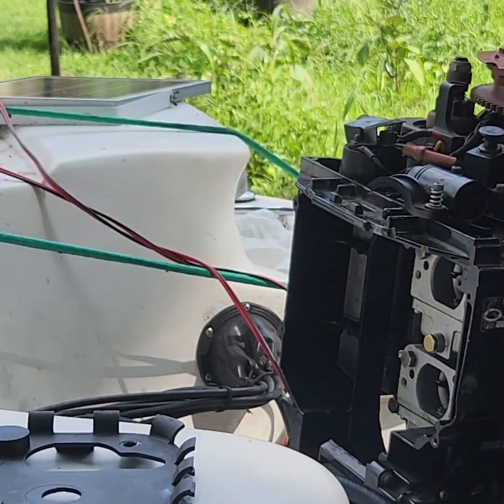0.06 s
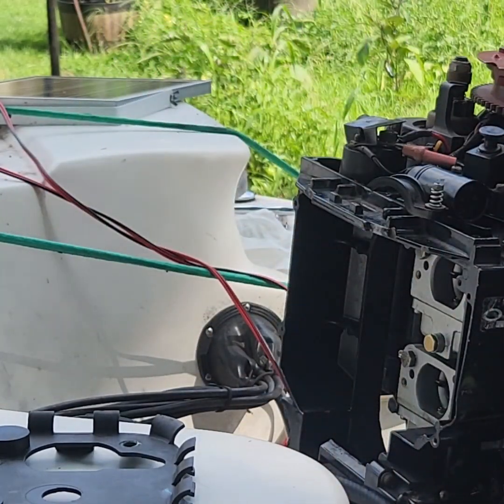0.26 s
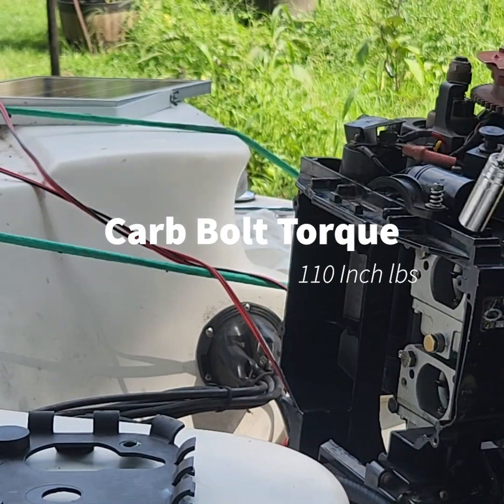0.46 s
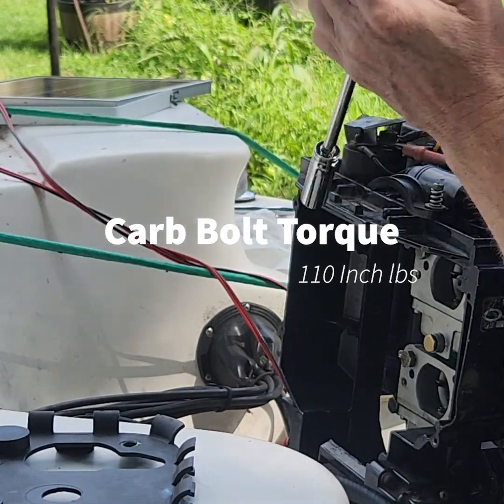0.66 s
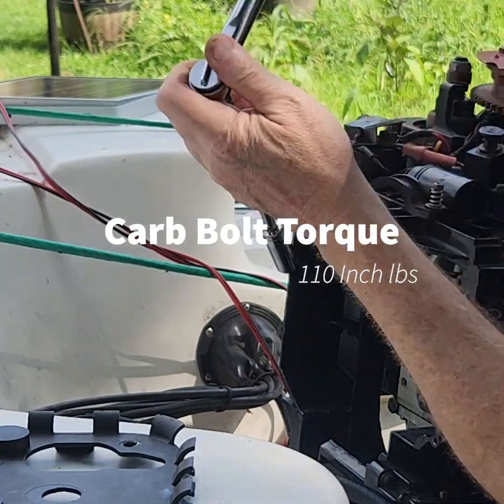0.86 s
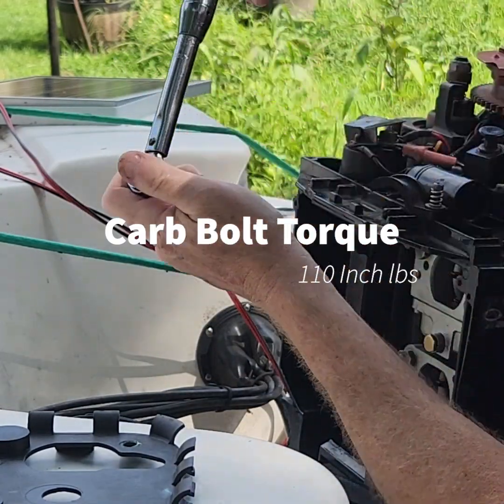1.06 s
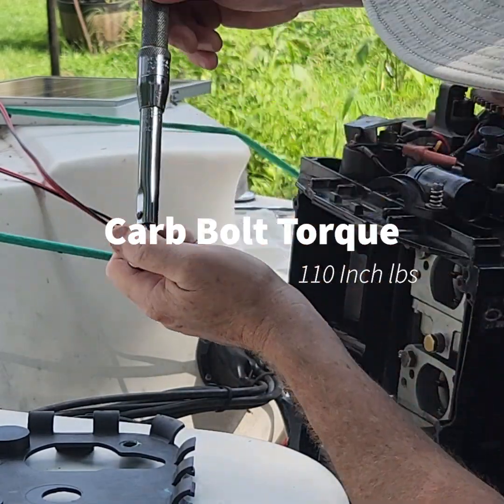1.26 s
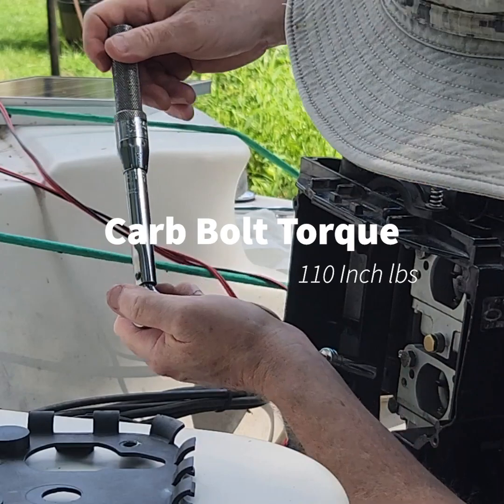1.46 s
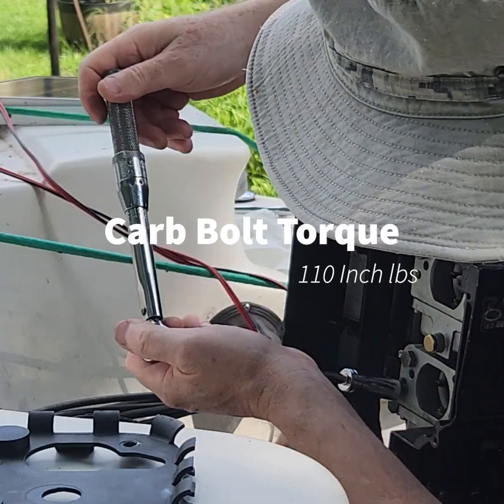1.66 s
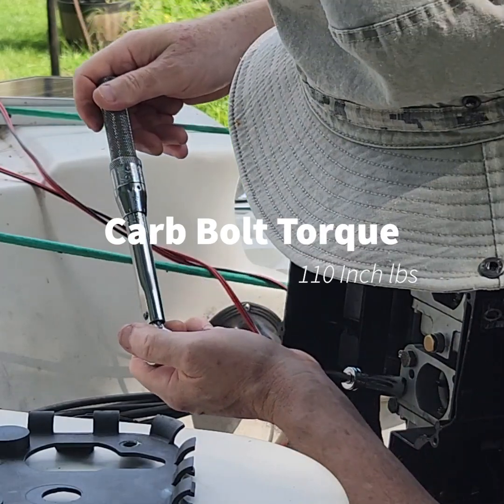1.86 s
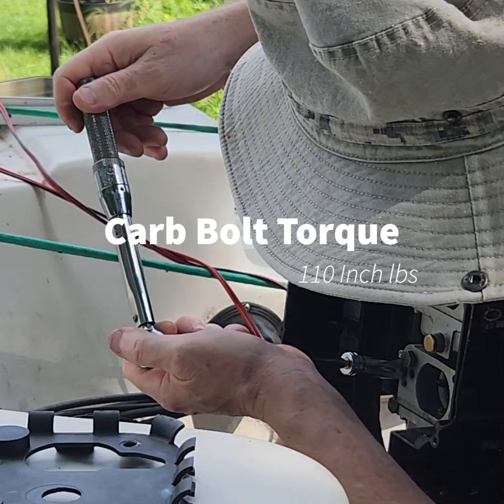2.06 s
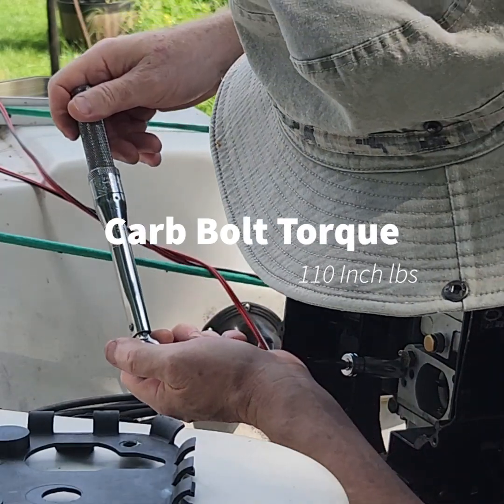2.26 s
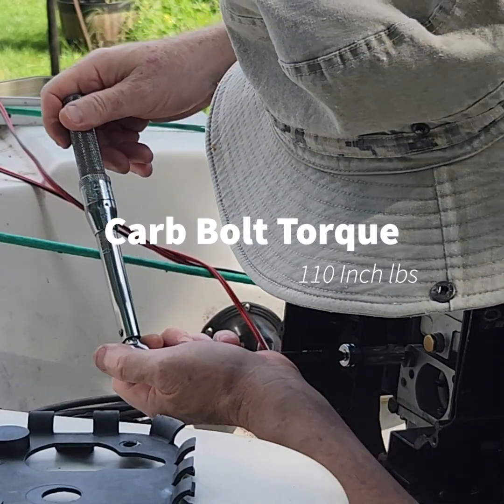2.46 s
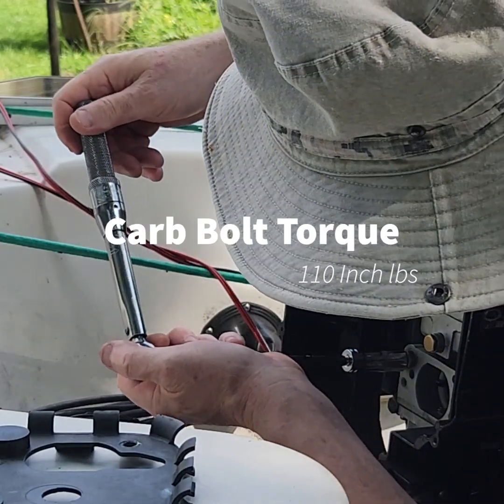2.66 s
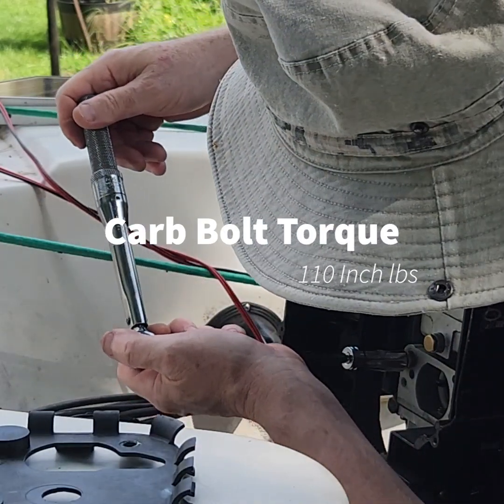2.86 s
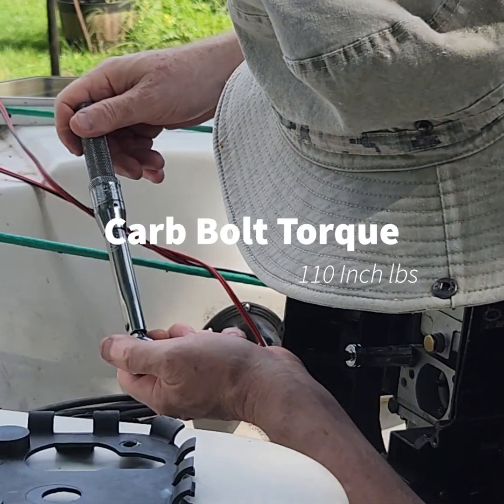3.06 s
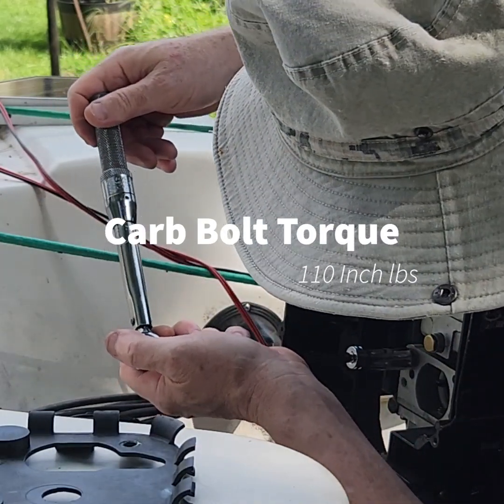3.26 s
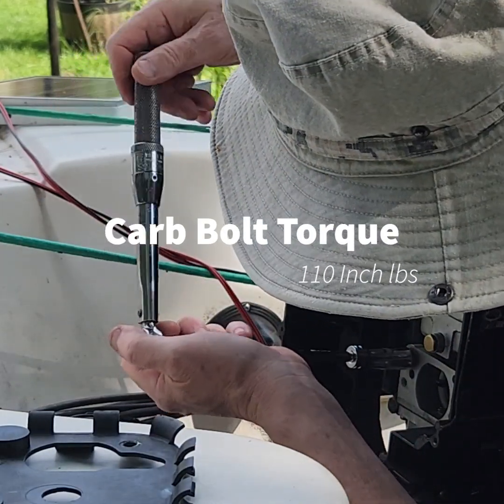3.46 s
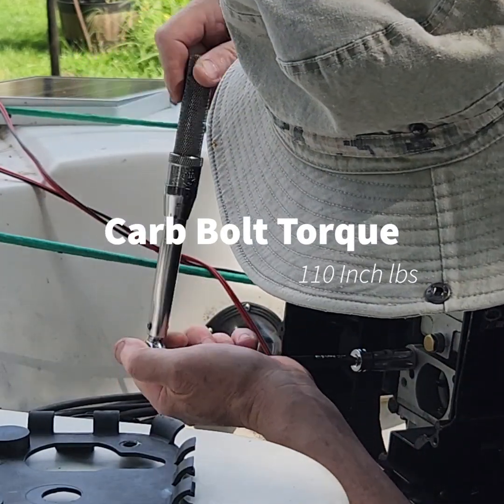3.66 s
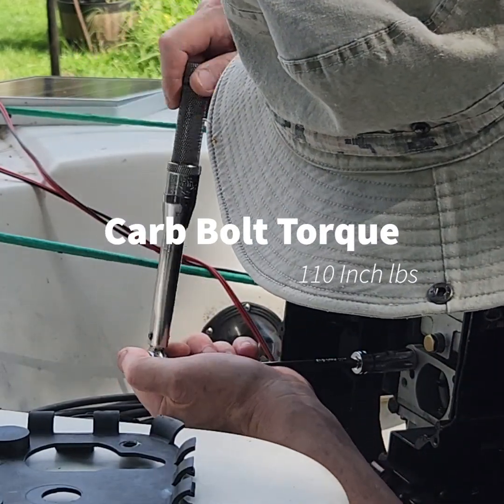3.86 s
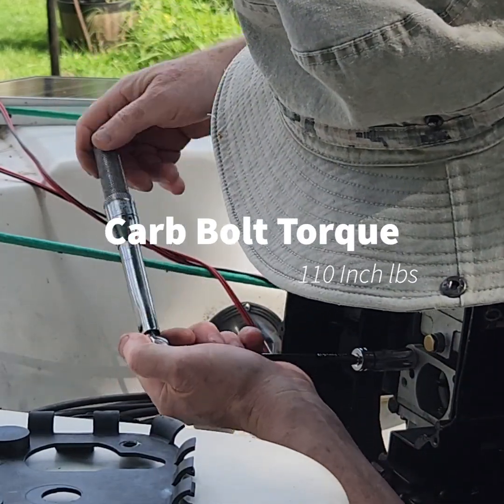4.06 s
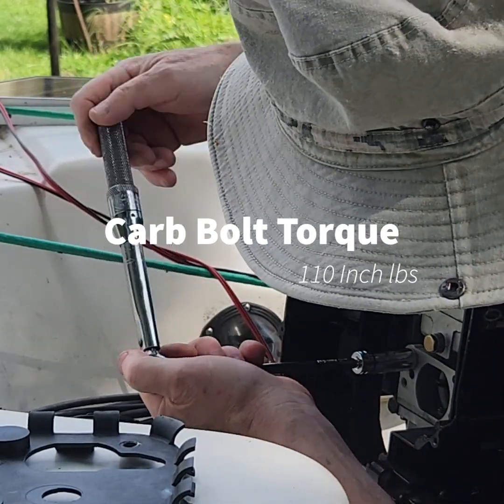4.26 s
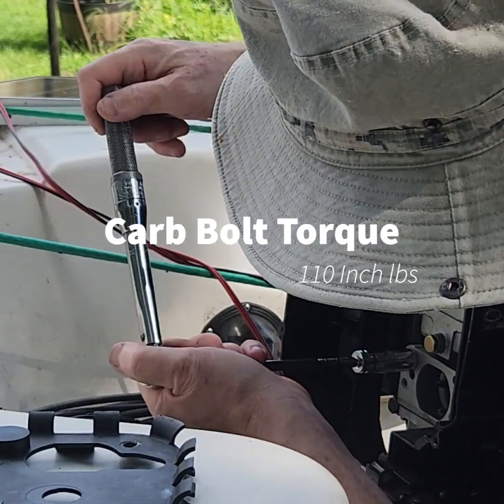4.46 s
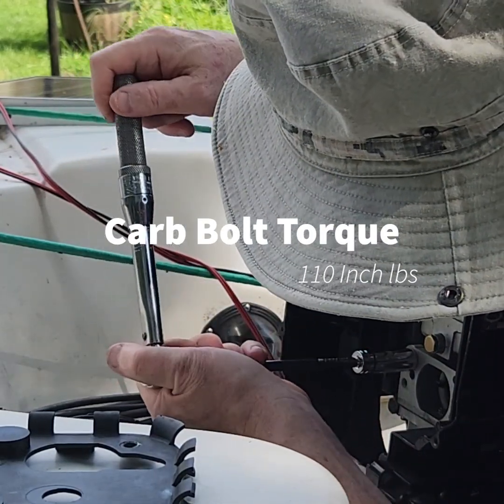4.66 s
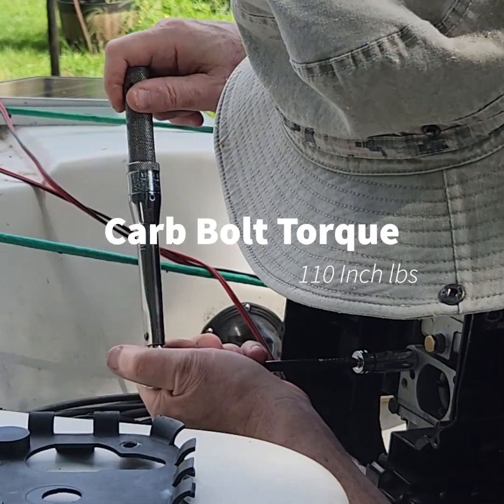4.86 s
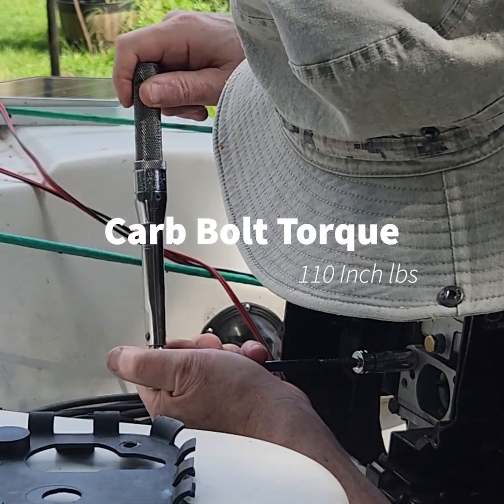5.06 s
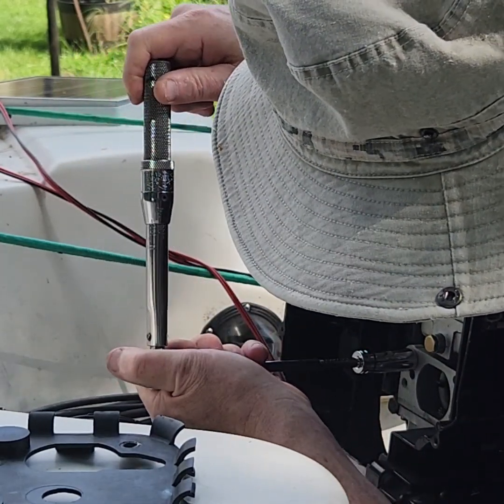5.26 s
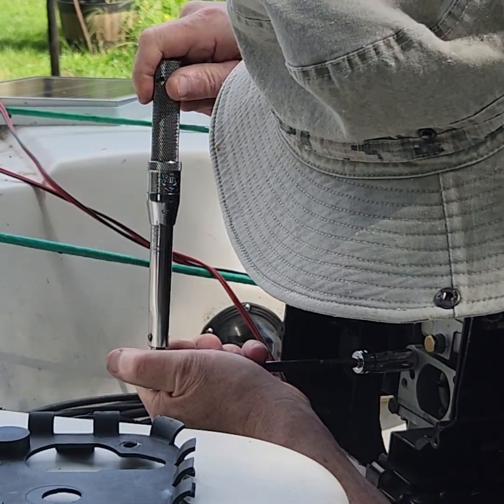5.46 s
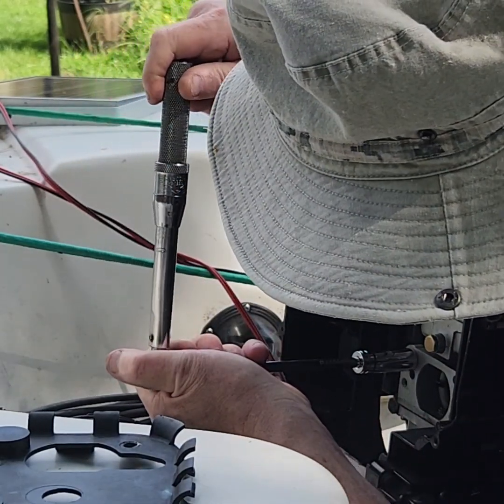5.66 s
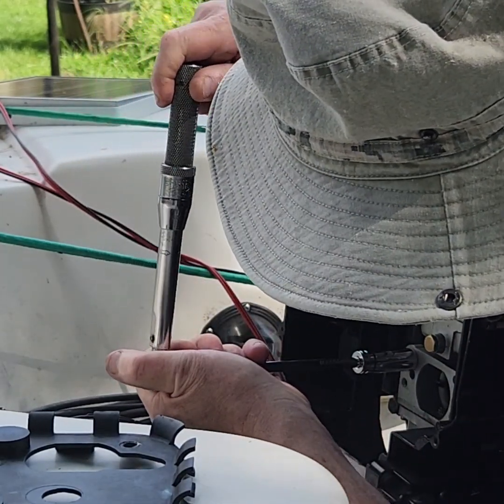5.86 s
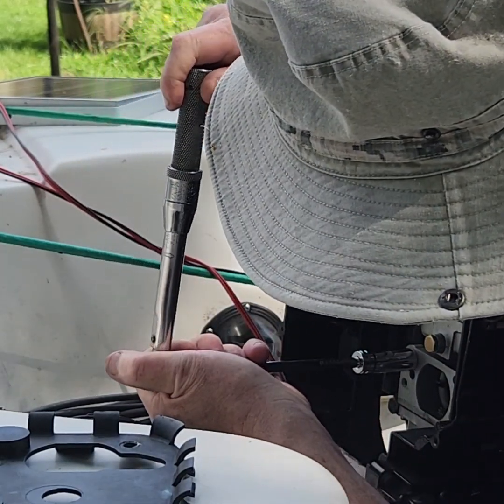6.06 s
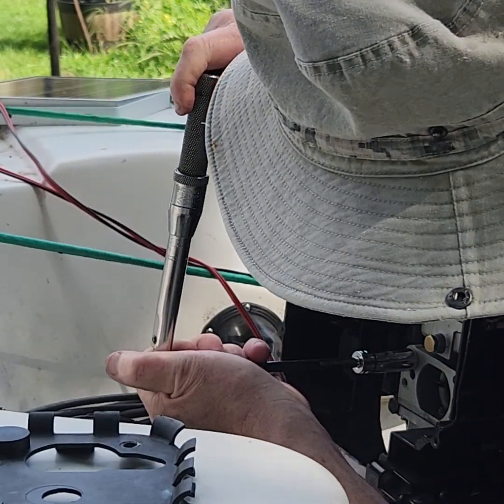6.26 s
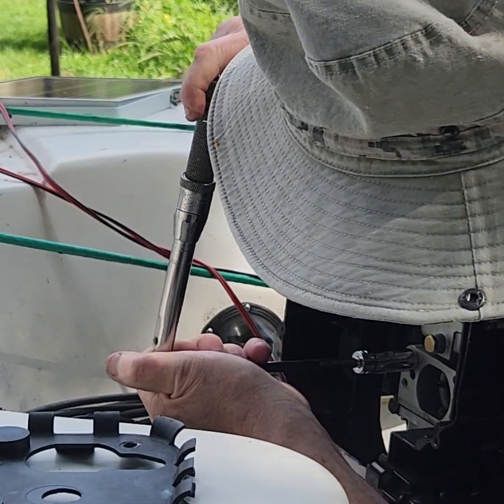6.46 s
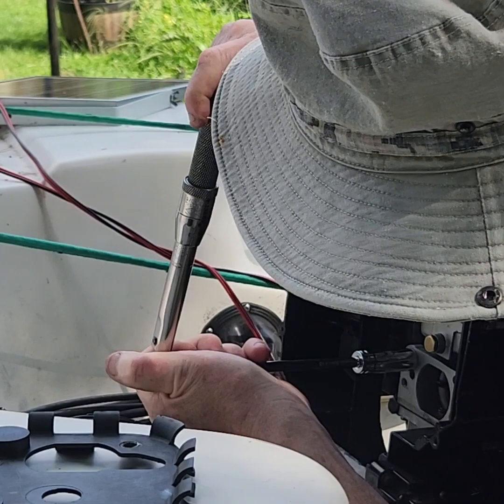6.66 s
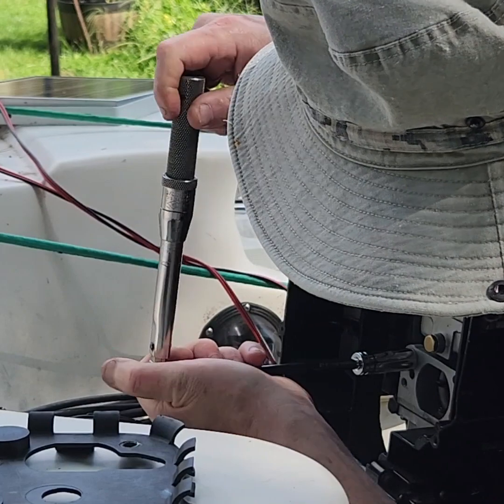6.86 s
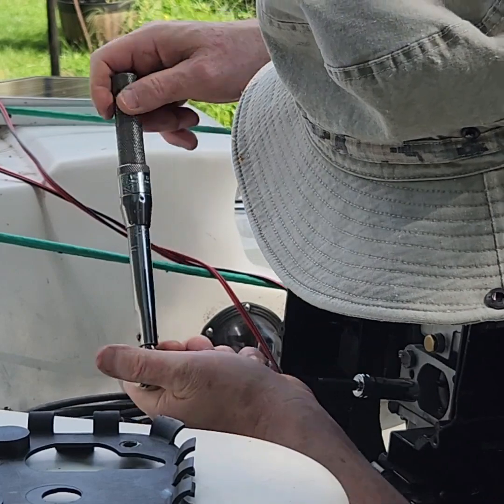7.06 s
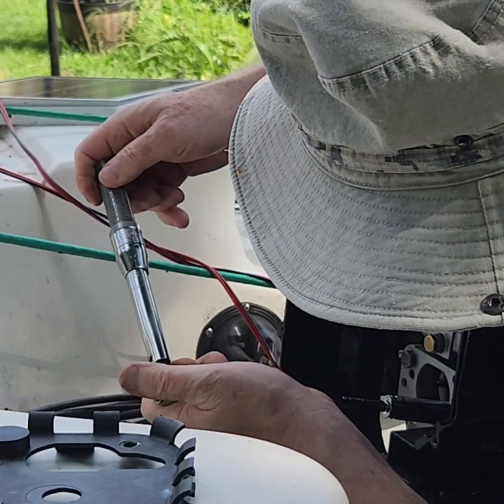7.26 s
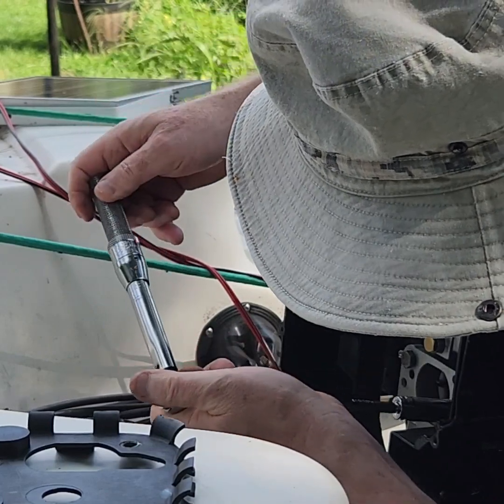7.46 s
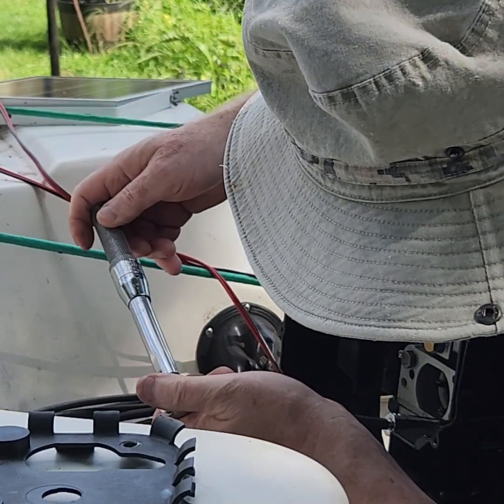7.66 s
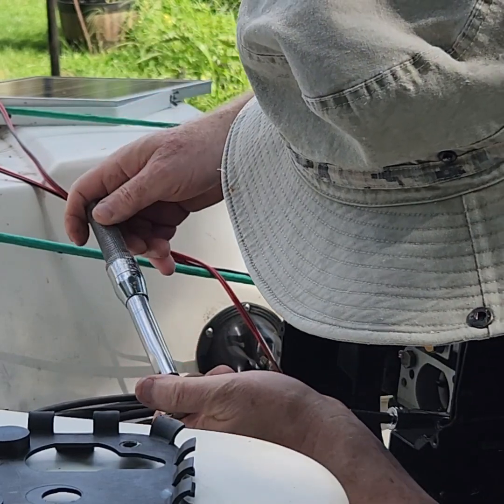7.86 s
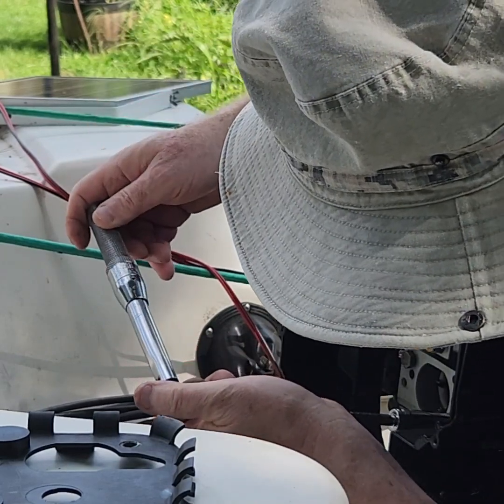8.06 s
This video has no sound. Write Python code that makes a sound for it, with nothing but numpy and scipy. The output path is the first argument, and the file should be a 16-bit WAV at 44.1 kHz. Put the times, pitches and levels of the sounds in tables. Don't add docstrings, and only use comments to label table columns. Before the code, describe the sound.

Outdoors, close to the work, a shrill steady insect hiss sits over faint low traffic and rustling leaves. Small steel knocks come irregularly as a socket is fitted, then a firm metallic clack, a quick run of thin ratchet ticks, and a long pause. Late on, a very loud, dry wrench crack and a slightly softer reset snap follow, then a few loose clinks. Faint birds call far away.

```python
import sys
import numpy as np
from scipy import signal
from scipy.fft import rfft, irfft, next_fast_len
from scipy.io import wavfile
from scipy.ndimage import uniform_filter1d

SR = 44100
rng = np.random.default_rng(int(sys.argv[2]) if len(sys.argv) > 2 else 0)


def volts(x):
    e = np.asarray(x, float) / 20
    return 10 ** e


def wav_out(sig):
    wavfile.write(sys.argv[1], SR, np.round(np.clip(np.atleast_2d(sig).T, -1, 1) * 32767).astype(np.int16))


N = 358091


def unit(x):
    return x / np.sqrt(np.mean(x ** 2))


def ears_db(left_minus_right_db):
    return np.array([[left_minus_right_db], [-left_minus_right_db]]) / 2


def add(out, sound, s):
    i = int(s * SR)
    out[:, i:i + sound.shape[1]] += sound[:, :N - i]


def shaped(x, gain):
    size = next_fast_len(N)
    hz = np.arange(size // 2 + 1) * SR / size + 1
    return irfft(rfft(x, size) * gain(hz), size)[..., :N]


def walk(rate_hz):
    k = int(SR / rate_hz)
    held = np.repeat(rng.standard_normal(N // k + 1), k)
    return 0.83 * uniform_filter1d(uniform_filter1d(held, k), k)[:N]


HULL_DB, HULL_T60_S = -31.5, 0.17
CRACK_DB, SOFT_CRACK_DB = -5, -20
EAR_TURN_RAD = 0.76


def strike(modes, peak_db, chatter_s, chatter_db, pan_db, spread=1.0, hull_db=HULL_DB, crack_db=CRACK_DB):
    hz, db, t60_s = np.transpose(modes)
    t = np.arange(SR // 6) / SR
    both, apart = rng.standard_normal((2, len(hz)))
    ear_turn = EAR_TURN_RAD * np.sign(apart) * np.minimum(hz / 900, 1) * np.array([[-1], [1]])
    weight = volts(db) * np.exp(1j * spread * (both + ear_turn))
    ring = (weight @ np.exp(np.outer(2j * np.pi * hz - np.log(1000) / t60_s, t))).imag
    ring = ring * np.minimum(t / 0.00039, 1)
    damped = (weight @ np.exp(np.outer(2j * np.pi * hz - hz / 8.0 - 500, t[:512]))).imag
    noise = rng.standard_normal((3, len(t)))
    chatter = volts(chatter_db) * (noise[0] + 0.27 * noise[1:]) * np.exp(-t / chatter_s)
    diffuse = uniform_filter1d(noise[1:, ::-1], size=2, axis=1)
    echo = volts(hull_db) * diffuse * np.exp(-np.log(1000) * t / HULL_T60_S)
    sound = ring + signal.fftconvolve(damped, chatter + echo, axes=1)[:, :len(t)]
    sound[:, :damped.shape[1]] += volts(crack_db) * np.diff(damped, prepend=0)
    return sound / np.abs(sound).max(axis=1, keepdims=True) * volts(peak_db + ears_db(pan_db))


# t/s, peak level/dB, chatter decay/s, chatter level/dB, left minus right/dB
SNAPS = [
    (3.6105, -13, 0.0083, -25, 0.5),
    (6.5295, -2.5, 0.0012, -10.5, 2),
    (6.7711, -9, 0.0037, -14.5, 3.3),
]
# f/Hz, level/dB, t60/s
SEAT_MODES = [(600, -37, .04), (930, -35, .04), (1220, -5.5, 0.04), (1555, 2.5, 0.021), (2060, -9, 0.05),
              (2350, 3.5, 0.022), (2886, 5, 0.04), (3230, 3.5, 0.017), (3850, -10, .04), (4500, 3, 0.013),
              (5630, -3, 0.01), (6950, 0, 0.013), (8000, -3, 0.014), (8740, -8, .012), (10500, -7, .012),
              (11760, -7, .02), (13050, -9, 0.02), (14500, -1.5, .012), (15100, -13, .01)]
# f/Hz, level/dB, t60/s
BREAK_MODES = [(97, -19, 0.25), (564, -21, 0.12), (985, -12, 0.048), (1516, -7, 0.041), (2140, -35, 0.017),
               (2660, -9.5, 0.013), (2770, -16, 0.094), (3180, 1, 0.018), (3420, -27, 0.045),
               (4400, -13, 0.025), (4740, -7.5, .015), (5370, -3.5, 0.02), (6530, -12, 0.017),
               (7800, -16, 0.016), (7350, 2, 0.032), (7860, 6, 0.022), (9290, 2.5, 0.012),
               (10600, -8, 0.0092), (12250, -6, 0.013), (11600, -5, 0.012), (13640, -13, .01),
               (14900, -7, 0.011)]
# f/Hz, level/dB, t60/s
RESET_MODES = [(366, -27, 0.22), (754, -21, 0.082), (905, -4, 0.065), (1463, -3, 0.071), (1950, -10, 0.055),
               (2520, -8, .015), (2740, -19, 0.098), (3040, 1, 0.019), (3800, -2.5, 0.02),
               (4500, -3, 0.023), (5140, -17, 0.017), (5430, 4.5, 0.019), (6300, -10, .02),
               (7150, -22, .018), (7400, 9, 0.013), (8000, -23, .015), (9000, -29, .012),
               (10600, -25, .012), (11700, -11, 0.015), (12570, -4, .014), (13900, -20.5, .012),
               (15800, -18, 0.0085)]


def snaps():
    out = np.zeros((2, N))
    for (s, *blow), modes in zip(SNAPS, (SEAT_MODES, BREAK_MODES, RESET_MODES)):
        add(out, strike(modes, *blow), s)
    return out


# t/s, peak level/dB, level under 6 kHz/dB, bounce delay/s, bounce level/dB
TICKS = [
    (3.921, -31, -12, .0078, -5),
    (3.9541, -29, -12, 0.0041, -4),
    (3.9843, -25.5, -20, .0064, -6.5),
    (4.019, -31.5, -2, .0059, -8.5),
    (4.0716, -33, -4, .0113, -10),
]
# f/Hz, level/dB, t60/s
PAWL = [(2980, -15, 0.016), (3500, 7.5, 0.0081), (4670, 1, 0.0083), (5360, 3, 0.014), (6530, 5.5, 0.0045),
        (7740, 13, 0.0061), (8580, 1, 0.019), (9800, -16, 0.0036), (11000, 1, 0.0079), (12000, 3, 0.0096),
        (12500, -3, 0.0056), (13600, 7, .007), (15000, -3, .007), (15000, -11, 0.0073)]
BOUNCE_LOW_DB, PAWL_HULL_DB = 1.5, -37


def ratchet():
    out, pawl = np.zeros((2, N)), np.array(PAWL)
    low = np.outer(pawl[:, 0] < 6000, [0, 1, 0])
    for s, db, low_db, after_s, bounce_db in TICKS:
        drop = strike(pawl + low * low_db, db + 6.0, 0.0014, -17, 1.7, hull_db=PAWL_HULL_DB)
        add(out, drop, s)
        bounce = strike(pawl + low * BOUNCE_LOW_DB, db + 6.5 + bounce_db, 0.00076, -17.5, 2.8,
                        hull_db=PAWL_HULL_DB)
        add(out, bounce, s + after_s)
    return out


# t/s, peak level/dB, loose-fit f/Hz, loose fit over shaft/dB, hardness/dB
KNOCKS = [(0.3494, -50.5, 1410, -3, -4), (1.7075, -30.5, 1406, 3, -14.5), (2.0713, -34, 1135, 6.5, 2),
          (2.1035, -39.5, 1365, 30, -7), (2.513, -30.5, 1383, -3.5, -1), (2.9797, -32.5, 1450, -13, -14),
          (3.057, -38.5, 1060, -11, -17), (3.0808, -29.5, 1133, 10, 1), (3.5950, -42, 1460, 11, 1),
          (3.604, -33, 1253, 8, -2), (4.388, -49, 1500, -14, -33), (6.5245, -36, 1400, -15, 13),
          (6.766, -36, 1400, 2, 2), (6.958, -46.5, 1330, 8, 5), (7.3327, -50, 1390, -1, -9),
          (7.4008, -28.5, 1600, -2, -1.5), (7.505, -40, 1160, 3, -16), (7.5216, -32, 1490, -2.5, -3),
          (7.5495, -40.5, 1040, 12, -3), (7.6934, -54, 1420, 10, -7), (7.8226, -38, 1160, 9, -28)]
KNOCK_BANDS_HZ = [1800, 3300, 6000]
# f/Hz, level/dB, t60/s
STEEL = [(1330, 5.5, 0.056), (840, -23, 0.036), (1190, -20, 0.04), (1573, 4.5, 0.02), (2063, -5.5, 0.11),
         (2270, 10, 0.0087), (2544, 5, 0.03), (2750, -8.5, 0.14), (2960, 4, 0.037), (3530, 9, 0.023),
         (3594, 2, 0.049), (4010, -1, 0.05), (4290, -7, 0.022), (4600, -15, .015), (5580, -2.5, 0.012),
         (6700, -8, .015), (7900, -10, 0.013), (8750, -6, 0.011), (10930, -18, 0.0092), (11950, 8.5, 0.022),
         (13100, -16, .012), (14500, 1.5, .012)]
SHRILL_DB, SHRILL_SHARE = -22, 0.26


def knocks():
    out, steel = np.zeros((2, N)), np.array(STEEL)
    band = np.searchsorted(KNOCK_BANDS_HZ, steel[:, 0])
    for s, db, loose_hz, loose_db, hard_db in KNOCKS:
        lift_db = np.array([loose_db, 0, hard_db, SHRILL_DB + SHRILL_SHARE * hard_db])[band]
        grip = 1 + 0.05 * rng.standard_normal(len(steel)) * (steel[:, 2] < 0.08)
        modes = steel * np.c_[grip, np.ones(len(steel)), grip]
        modes[:, 1] += lift_db
        modes[0, 0] = loose_hz
        add(out, strike(modes, db + 2.5, 0.012, -28.5, 4.1, crack_db=SOFT_CRACK_DB), s)
    return out


# t/s, peak level/dB
THUDS = [
    (.4480, -41),
    (.8300, -33.5),
    (7.403, -41.5),
    (7.529, -43.5),
]
# f/Hz, level/dB, t60/s
HULL = [(92, 2, 0.17), (181, -5.5, 0.11), (336, 2.5, 0.073), (560, -10, .04), (880, 2.5, 0.013),
        (1330, 0, 0.016), (2000, -9, 0.013), (3150, -18, .02)]


def thuds():
    out = np.zeros((2, N))
    for s, db in THUDS:
        add(out, strike(HULL, db, 0.03, -23, 2.5, spread=0.14, crack_db=SOFT_CRACK_DB), s)
    return out


# f/Hz, spread/Hz, skirt/(dB/kHz), click rate/Hz, throb/Hz, throb depth 0-1, level/dB, left minus right/dB
CHORUS = [(7562, 260, 34, 240, 66, 0, -45.5, 3.5), (6993, 290, 34, 240, 41.3, 0.02, -55.5, 7),
          (5590, 45, 30.5, 200, 30, 0.08, -78.5, 5.5), (13940, 3200, 7, 230, 51, 0.1, -85.5, 17)]
# f/Hz, stop t/s, extra level until then/dB
LOUD_START = (5520, .356, 9.1)


def insects(count=10):
    out = np.zeros((2, N))
    loud_hz, loud_stop_s, loud_lift_db = LOUD_START
    for hz, spread_hz, skirt_db, rate_hz, throb_hz, depth, db, pan_db in CHORUS:
        tempo = 1 + 0.1 * rng.standard_normal((2, count, 1))
        jitter = 1 + 0.15 * rng.standard_normal((2, count, 3000))
        at = np.cumsum(np.abs(SR / rate_hz * tempo * jitter), axis=2)
        beat = 2 * np.pi * throb_hz * at / SR + 0.2 * rng.standard_normal((2, count, 1))
        size = (1 + depth * np.sin(beat)) * rng.standard_normal(at.shape)
        clicks = np.array([np.bincount(a[a < N].astype(int), z[a < N], N) for a, z in zip(at, size)])

        def wing_gain(f):
            off_hz = np.hypot(f - hz, spread_hz) - spread_hz
            return volts(-skirt_db / 1000 * off_hz) * (f < 16000)

        wing = shaped(clicks, wing_gain)
        loud_db = loud_lift_db * (abs(hz - loud_hz) < 500) * (np.arange(N) < loud_stop_s * SR)
        swell_db = 0.5 * walk(2.03)
        out += unit(wing) * volts(db + ears_db(pan_db) + loud_db + swell_db)
    return out


TREES_DB = -25


def note(length_s, start_hz, end_hz, tones, rough):
    u = np.linspace(0, 1, int(length_s * SR))
    waver = uniform_filter1d(rng.standard_normal((2, len(u))), 150, axis=1) * 12
    glide_hz = start_hz + (end_hz - start_hz) * u ** 1.9
    phase = 2 * np.pi * np.cumsum(glide_hz * (1 + 0.049 * rough * u * waver[0])) / SR
    voice = sum(volts(db) * np.sin(k * phase + k * k) for k, db in tones)
    voice = unit(voice) * np.sin(np.pi * u ** 1.05) ** 0.58 * (1 + rough * waver[1])
    t = np.arange(SR // 8) / SR
    trees = rng.standard_normal((2, len(t))) * np.exp(-t / 0.035) * volts(TREES_DB)
    trees[:, 0] = 1
    return signal.fftconvolve(voice[None], trees, axes=1)


# t/s, length/s, start f/Hz, end f/Hz, level/dB
CAWS = [
    (5.917, .21, 276.3, 210, -57.5),
    (6.234, 0.18, 265, 222, -56.5),
]
# multiple, level/dB
CAW_TONES = [(6, -2), (7, 0), (8, -14), (9, -9), (10, -8), (11, -12), (12, -6), (13, -1), (14, -14)]
# t/s, length/s, start f/Hz, end f/Hz, level/dB
CHIRPS = [(0, 0.092, 1950, 1450, -68), (0, 0.097, 3776, 2875, -71.5), (.265, 0.047, 1914, 1920, -63.5),
          (.31, 0.034, 1498, 1530, -62), (1.11, 0.05, 2000, 1970, -61), (1.996, 0.068, 1885, 2000, -68.5),
          (2.753, 0.089, 2115, 1950, -70.5), (3.167, 0.042, 4100, 3920, -70),
          (5.849, 0.071, 2186, 2000, -71), (5.255, 0.089, 2114, 2140, -69.5),
          (5.318, 0.069, 2008, 1967, -66), (5.322, 0.078, 2773, 2850, -71.5),
          (5.579, .17, 2120, 1786, -66.5), (5.625, .13, 2765, 2910, -72), (5.70, 0.047, 3500, 3490, -71),
          (5.799, 0.052, 3690, 3840, -69), (6.137, 0.054, 2320, 2480, -68), (6.407, 0.042, 2980, 2970, -65)]


def birds():
    out = np.zeros((2, N))
    for s, length_s, start_hz, end_hz, db in CAWS:
        add(out, volts(db) * note(length_s, start_hz, end_hz, CAW_TONES, 0.37), s)
    for s, length_s, start_hz, end_hz, db in CHIRPS:
        add(out, volts(db) * note(length_s, start_hz, end_hz, [(0.98, 0)], 0.6), s)
    return out * volts(ears_db(3))


def curve(rows):
    s, db, rise, fall = np.transpose(rows)[:, :, None]
    late = np.arange(N) / SR - s
    drop_db = np.where(late < 0, -late * rise, late * fall)
    return np.maximum(db - drop_db, 0).max(axis=0)


# peak t/s, level over calm/dB, rise/(dB/s), fall/(dB/s)
LEAVES = [
    (0.0, 27, 50, 45),
    (1.16, 8.5, 8, 30),
    (3.0, 16, 15, 43),
    (4.2, 19.5, 18, 28),
    (5.8, 11.5, 40, 2.5),
    (6.39, 15.5, 28, 7),
    (7.47, 17, 70, 22),
]
CALM_DB, STEP_S, STEP_DB = -4.5, 0.36, -13


def leaf_level():
    stepped = STEP_DB * (np.arange(N) / SR > STEP_S)
    return CALM_DB + np.maximum(curve(LEAVES[:1]) + stepped, curve(LEAVES[1:]))


# nearest t/s, level over drone/dB
TRAFFIC = [
    (0.0, 3),
    (1.08, 2.5),
    (2.47, 2.5),
    (3.9, 3),
    (6.78, 3),
    (7.57, 5),
]
DRONE_DB, PASS_S = -0.5, 0.48


def traffic_level():
    return DRONE_DB + curve([(s, db, db / PASS_S, db / PASS_S) for s, db in TRAFFIC])


AIR_DB = -46
# f/Hz, level/(dB per Hz)
AIR = [(12, -33), (20, -7), (65, -0.5), (103, -3.5), (118, -10), (188, -15.5), (305, -23), (335, -23.5),
       (718, -21), (1280, -28), (1580, -28.5), (3380, -43), (5000, -49.5), (6500, -82), (11000, -120)]
# f/Hz, correlation
AIR_ALIKE = [(60, 0.98), (130, 0.96), (290, 0.83), (640, -0.021), (1400, -0.21), (3100, -0.014)]


def air():
    out, leaves, traffic = 0, leaf_level(), traffic_level()
    size = next_fast_len(N)
    octave = np.log2(np.arange(size // 2 + 1) * SR / size + 1)
    alike_hz, likeness = np.transpose(AIR_ALIKE)
    alike = np.interp(octave, np.log2(alike_hz), likeness)
    air_hz, air_db = np.transpose(AIR)
    spectrum = volts(np.interp(octave, np.log2(air_hz), air_db))
    mid, side = rfft(rng.standard_normal((2, size))) * spectrum
    ears = np.sqrt(1 + alike) * mid + np.sqrt(1 - alike) * side * np.array([[1], [-1]])
    for centre in np.log2(30) + np.arange(9):
        window = np.cos(np.pi / 2 * np.clip(octave - centre, -1, 1)) ** 2
        band = irfft(ears * window, size)[:, :N]
        leafy = np.clip((centre - 9.0) / 5.4, 0, 1)
        bassy = np.clip((8.6 - centre) / 1.8, 0, 1)
        out = out + band * volts(leafy * leaves + bassy * traffic + 1.3 * walk(9))
    return unit(out) * volts(AIR_DB + ears_db(1.2))


def scene():
    wrench = snaps() + ratchet() + knocks() + thuds()
    return wrench + insects() + birds() + air()


def low_pass(x):
    return signal.sosfilt(signal.butter(12, 16970, fs=SR, output="sos"), x)


TOP_HZ = 16500


def record(dry):
    mix = shaped(dry, lambda f: np.clip((TOP_HZ - f) / 400, 0, 1))
    return low_pass(mix)


dry = scene()
out = record(dry)
wav_out(out)
```